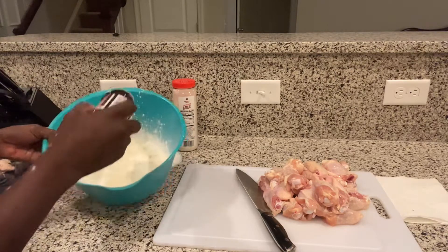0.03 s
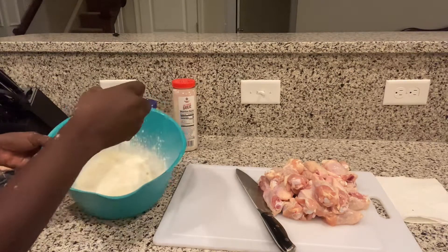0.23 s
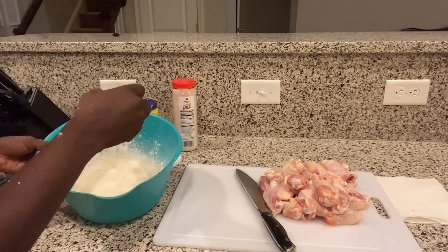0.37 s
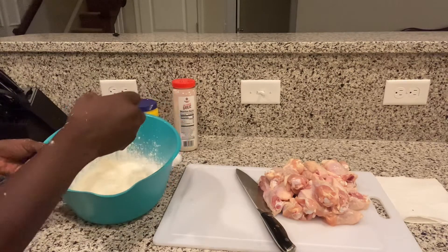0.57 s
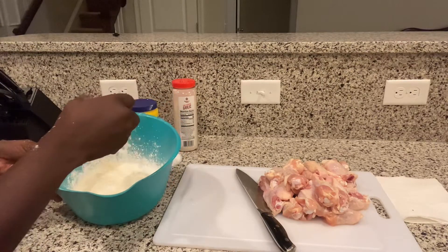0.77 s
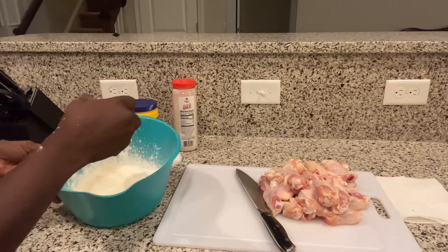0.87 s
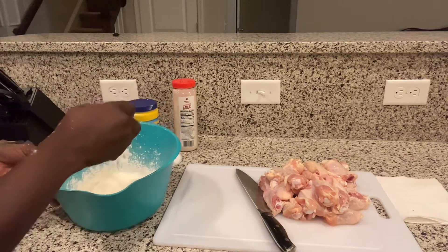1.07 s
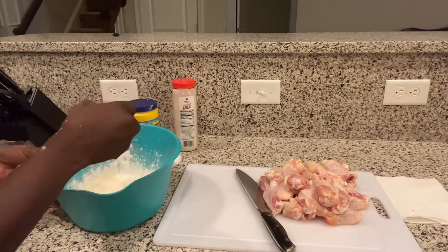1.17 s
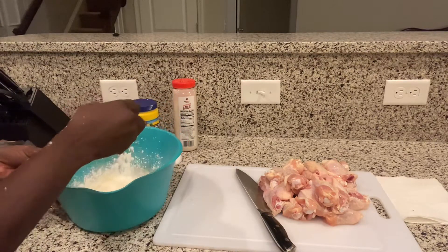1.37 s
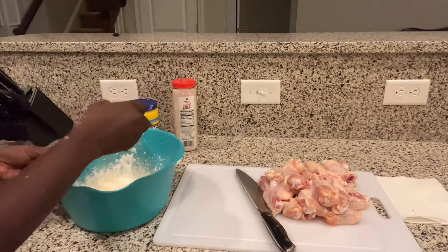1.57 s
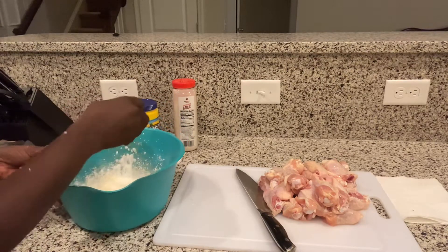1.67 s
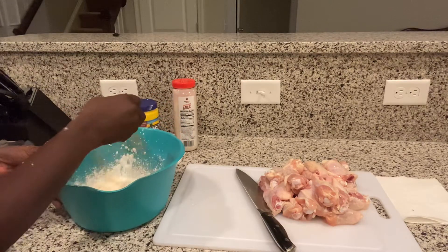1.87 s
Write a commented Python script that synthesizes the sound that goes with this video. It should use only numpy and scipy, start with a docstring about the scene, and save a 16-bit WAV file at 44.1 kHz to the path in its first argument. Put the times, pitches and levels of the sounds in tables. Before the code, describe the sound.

Close by in a hard-walled kitchen, a plastic bowl lands with a hollow knock and quick dull thumps. A plastic shaker then sifts seasoning softly, with small ticks and faint scrapes, over a low appliance hum.

```python
"""A hard-walled kitchen, heard through a closely spaced pair of microphones at the stone counter.
An appliance hums in the background from the start. Almost at once a plastic mixing bowl is set down:
one hollow knock, a few dull thumps as it rocks flat, and its fine powder shifts. From about 0.6 s
seasoning is sifted into it from a plastic shaker, in soft grainy swishes with a few small ticks and,
near the end, faint scrapes. The room answers behind the knock and the shaking."""
import sys
import numpy as np
from scipy import signal
from scipy.fft import rfft, irfft
from scipy.io import wavfile

SR = 44100
rng = np.random.default_rng(int(sys.argv[2]) if len(sys.argv) > 2 else 0)


def wav_record(signal):
    """Record a signal, one row per channel, as 16-bit PCM in the file named by sys.argv[1]."""
    frames = np.transpose(np.atleast_2d(signal))
    bounded = np.clip(frames, -1, 1)
    # unit amplitude maps onto the largest positive 16-bit level
    quanta = np.round(bounded * 32767).astype(np.int16)
    wavfile.write(sys.argv[1], SR, quanta)


N = 83790

# How alike the room sounds at the two microphones. Each row: frequency in Hz, correlation.
MIC_LIKENESS = [(30, .93), (140, .9), (290, .68), (420, .2), (650, -.55), (1300, -.25), (3000, .15),
                (6500, .05), (15000, -.1)]
# Room tone, mostly rumble. Each row: frequency in Hz, relative level in dB.
ROOM_TONE = [(20, -33), (40, -16), (58, -1), (90, -3.5), (125, 1.5), (185, 2.5), (230, -6), (270, 4),
             (310, -4), (400, -3), (445, -13), (610, -12.5), (700, -18), (1150, -23.5), (1600, -35),
             (2100, -38), (2700, -45), (5000, -43.5), (8000, -42), (10000, -57), (13000, -45.5),
             (15000, -101)]
# The appliance's partials. Each row: pitch in Hz, level in dB, share of waver, left over right in dB.
HUM_PARTIALS = [(140.1, -52.3, 0.05, 1.3), (279.7, -58.5, 0.14, -5), (371.5, -71.5, 0.45, -4)]
# The swell of its second partial. Each row: time in seconds, added level in dB.
HUM_SWELL = [(0, -6), (.6, -1), (1.05, -3), (1.25, 10), (1.45, -7.5), (1.9, -0.5)]
# The kitchen's tail. Each row: frequency in Hz, seconds to fall 60 dB.
ROOM_T60 = [(100, 0.4), (400, 0.7), (900, .5), (1800, 0.71), (5000, 0.42), (8000, .5), (14000, 0.5)]
# The colour of its reflections. Each row: frequency in Hz, gain in dB.
ROOM_GAIN = [(60, -28), (150, -13), (300, -5), (430, -10), (540, -5), (640, -2), (760, -7), (900, -5),
             (1150, 2.5), (1600, -11), (2100, -6), (2500, -4.5), (2800, -8), (3500, -6), (5000, -1.5),
             (8000, -8), (14000, 1)]

# Spurts of grains and powder. Each row: start in seconds, length in seconds, grain level in dB,
# powder level in dB.
SPURTS = [(-.03, 0.09, -91, -75), (0.06, 0.14, -70.5, -78), (0.155, 0.039, -68, -73),
          (0.182, 0.087, -68.5, -73), (0.251, 0.095, -70.5, -67), (0.6, 0.05, -77.5, -95),
          (0.692, 0.046, -68.5, -74), (0.738, 0.066, -70, -66), (.822, 0.08, -73, -67),
          (0.886, .07, -70, -68), (0.955, 0.06, -69.5, -63), (1.003, 0.078, -70.5, -65.5),
          (1.11, 0.06, -72.5, -77), (1.175, 0.065, -72, -88), (1.255, 0.07, -74, -88),
          (1.32, .085, -76.5, -85), (1.4, 0.115, -78, -77), (1.54, 0.065, -75.5, -90),
          (1.595, .085, -75, -90), (1.708, 0.085, -73.5, -73), (1.812, 0.14, -76, -73)]
# The grains' hiss and the powder's lower rustle. Each row: frequency in Hz, relative level in dB.
GRAIN_SPECTRUM = [(500, -18), (2800, -7), (3400, -4), (4200, -2.5), (5200, -2.5), (6700, 2), (8200, -2.5),
                  (9300, -11), (10300, -26), (12500, -19), (15000, -30)]
POWDER_SPECTRUM = [(300, -10), (420, 3), (560, 15), (700, -8), (1100, -1), (1500, 4.5), (1850, -.5),
                   (2150, 1.5), (2700, -22), (4000, -8), (9000, -53)]
# Scrapes on the shaker's wall. Each row: peak time in seconds, level in dB, pitch in Hz.
SCRAPES = [(.01, -77, 3670), (1.555, -81, 4200), (1.737, -74.5, 4200), (1.86, -77, 4160)]
# Ticks of the shaker. Each row: start in seconds, click level in dB, body level in dB.
SHAKER_TICKS = [(.7038, -63, -78), (.7467, -64, -70), (.7711, -63, -69), (0.9028, -59, -64),
                (0.9058, -54, -56.5), (0.9325, -59, -62), (0.9675, -59, -61), (0.975, -61, -72),
                (0.9855, -54.5, -64), (0.9883, -62, -55.5), (1.0085, -71, -61), (1.028, -65, -63),
                (1.3745, -70, -67)]
# A tap on plastic, its click and its body. Each row: frequency in Hz, relative level in dB.
TAP_CLICK = [(1000, -25), (2800, -20), (3500, -2), (4200, 1.5), (7800, 2.5), (9500, -7), (10400, -16),
             (12500, -14), (15000, -39)]
TAP_BODY = [(300, -2), (530, 9), (700, -10), (1150, -6), (1550, 7), (1850, 0), (2150, 0), (2500, -28),
            (6000, -43)]

# The bowl's foot chattering on stone. Each row: start in seconds, click level in dB, body level in dB.
FOOT_CHATTER = [(.1555, -76, -46), (.1665, -52.5, -54), (.1835, -74, -47.5), (.2265, -74, -55),
                (.256, -66, -70), (.2815, -75, -54), (.2995, -78, -53)]
# The bowl rocking. Each row: start in seconds, level in dB, pitch in Hz.
ROCKING_THUMPS = [(0.13, -40, 77), (0.145, -31, 300), (.174, -34, 154), (0.203, -34, 143), (0.23, -40, 106)]
# The edge's first touch and the crack of contact. Each row: frequency in Hz, relative level in dB.
EDGE_CLICK = [(1500, -9), (3500, -6), (5500, 5), (7500, -3), (9300, -14), (10300, -32), (12500, -28),
              (15000, -48)]
CONTACT_CRACK = [(60, -5), (300, 8), (650, 1), (1100, 3), (1400, 12), (2400, 11), (2750, -1), (3300, 3),
                 (4200, 1), (5200, 6), (6400, 7), (8000, -4), (10000, -30), (13000, -27), (15000, -33)]
# The bowl's modes. Each row: pitch in Hz, level in dB, seconds to fall 60 dB, build-up in seconds,
# left over right in dB.
BOWL_MODES = [(190, -20.5, .075, .009, .6), (357, 3.3, .026, .008, -2.2), (463, -13.2, .027, .0009, -.4),
              (557, -21.1, .035, .0016, -8), (735, -35, .06, .001, 9), (860, -24.5, .02, .0016, 11),
              (1340, -32, .03, .0012, -1), (1532, -27, .018, .0012, -1), (1655, -21.5, .024, .001, -2),
              (1690, -54, .52, .004, -2), (1950, -38, .035, .0006, -1), (2155, -33.5, .03, .0006, -2),
              (2330, -40, .03, .0006, -1), (2470, -35.5, .034, .0006, 0), (2910, -41, .028, .0005, -1),
              (3370, -38, .016, .0005, 0), (3620, -43, .018, .0005, 0), (4100, -43, .017, .0005, 0)]


def amp(db):
    """Decibels to gain."""
    return 10 ** (np.asarray(db) / 20)


def unit(x):
    """Scales to rms 1."""
    return x / np.sqrt(np.mean(x ** 2) + 1e-20)


def curve_at(points, hz):
    """Reads a curve on a log-frequency axis."""
    f, value = np.transpose(points)
    return np.interp(np.log(hz + 1), np.log(f + 1), value)


def pan(db):
    """Gains at the two microphones, the left louder by db."""
    return amp(np.array([[db], [-db]]) / 2)


def since(start_s):
    """Seconds since a moment, zero before it."""
    return np.maximum(np.arange(N) / SR - start_s, 0)


def colour(x, spectrum):
    """Filters by a spectrum in dB."""
    size = x.shape[-1]
    return irfft(rfft(x) * amp(curve_at(spectrum, np.fft.rfftfreq(size, 1 / SR))), size)


def pair(x, likeness):
    """Makes two unrelated channels partly alike."""
    left, other = rfft(x)
    right = likeness * left + np.sqrt(1 - likeness ** 2) * other
    return irfft(np.array([left, right]), x.shape[-1])


def diffuse():
    """White noise as two closely spaced microphones hear it in a room."""
    return pair(rng.standard_normal((2, N)), curve_at(MIC_LIKENESS, np.fft.rfftfreq(N, 1 / SR)))


def band(noise, hz, width_hz):
    """One bell-shaped band of a noise, at rms 1."""
    bell = np.exp(-((np.fft.rfftfreq(N, 1 / SR) - hz) / width_hz) ** 2)
    return unit(irfft(rfft(noise) * bell, N))


def drift(rate_hz):
    """Slow random motion of rms 1."""
    return band(rng.standard_normal(N), 0, rate_hz)


def snap(start_s, decay_s, spectrum, size=4096):
    """A very short burst of coloured noise."""
    noise = unit(colour(pair(rng.standard_normal((2, size)), likeness=.4), spectrum))
    out, start = np.zeros((2, N)), round(start_s * SR)
    out[:, start:start + size] = noise * np.exp(-np.arange(size) / SR / decay_s)
    return out


def room_tone(level_db=-52):
    """The kitchen's low rumble and air, all around the microphones."""
    return amp(level_db) * unit(colour(diffuse(), ROOM_TONE))


def appliance(waver_hz=6, whine_db=-88):
    """In the background, a wavering motor hum with a faint whine."""
    t, hum = since(0), np.zeros((2, N))
    for k, (hz, db, waver, pan_db) in enumerate(HUM_PARTIALS):
        swell_db = np.interp(t, *np.transpose(HUM_SWELL)) if k == 1 else 0
        phase = 2 * np.pi * hz * t
        tone = (1 + waver * drift(waver_hz)) * np.sin(phase)
        tone += waver * drift(waver_hz) * np.cos(phase)  # the phase wanders too
        hum += pan(pan_db) * amp(db + swell_db) * np.sqrt(2) * tone
    return hum + amp(whine_db) * band(diffuse(), hz=3500, width_hz=105)


def kitchen_reverb(sound, delay_s=.0069, early_db=-6.5, early_decay_s=.0095):
    """Counter and wall reflect back to the microphones first, then a tail dies band by band."""
    hz, frame_s, bands = signal.stft(diffuse(), SR, nperseg=256)
    t60, t = curve_at(ROOM_T60, hz)[:, None], since(delay_s)
    fade = amp(-60 * frame_s / t60) * np.sqrt(2 * np.log(1000) / (t60 * SR))  # equal energy per band
    tail = signal.istft(bands * fade, SR, nperseg=256)[1][:, :N]
    early = diffuse() * np.exp(-t / early_decay_s) * np.sqrt(2 / (early_decay_s * SR))
    response = colour(tail + amp(early_db) * early, ROOM_GAIN) * (t > 0)
    return signal.fftconvolve(sound.mean(0)[None], response, axes=1)[:, :N]


def wall_scrapes(half_width_s=.02):
    """Grains scrape along the shaker's plastic wall and ring it briefly."""
    t = since(0)
    return sum(amp(db) * np.exp(-((t - peak_s) / half_width_s) ** 2) * band(diffuse(), hz, width_hz=750)
               for peak_s, db, hz in SCRAPES)


def plastic_taps(rows, click_decay_s=.0025, body_decay_s=.0039):
    """Light contacts on plastic, a little to the right: a sharp click and the wall's short answer."""
    taps = np.zeros((2, N))
    for start_s, click_db, body_db in rows:
        taps += amp(click_db) * snap(start_s, click_decay_s, TAP_CLICK)
        taps += amp(body_db) * snap(start_s, body_decay_s, TAP_BODY)
    return pan(db=-3) * taps


def grains_and_powder(grains_per_s=4000, spread_db=2, rise_s=.012, fall_s=.016, clump_db=1.8):
    """Near the centre, each spurt lets a cloud of tiny grains slide and land while powder rustles."""
    sizes = amp(spread_db * np.minimum(rng.exponential(1, (2, N)), 4))
    signs = rng.choice([-1., 1.], (2, N))
    landings = rng.random((2, N)) < grains_per_s / SR
    grains = unit(colour(pair(sizes * signs * landings, likeness=.086), GRAIN_SPECTRUM))
    powder = unit(colour(diffuse(), POWDER_SPECTRUM))
    t, flow = since(0), np.zeros((2, N))
    for start_s, length_s, grain_db, powder_db in SPURTS:
        swell = .5 + .5 * np.tanh((t - start_s) / rise_s - .5)
        ebb = .5 + .5 * np.tanh((start_s + length_s - t) / fall_s - .5)
        flow += swell * ebb * (amp(grain_db) * grains + amp(powder_db) * powder)
    clumps = amp(clump_db * drift(rate_hz=70))  # the flow comes unevenly
    return pan(db=-.5) * clumps * flow


def bowl_settling(rise_s=.0052):
    """Soft low thumps and a faint chatter as the bowl rocks flat on the counter."""
    out = plastic_taps(FOOT_CHATTER)
    for start_s, db, hz in ROCKING_THUMPS:
        t = since(start_s)
        pulse = t / rise_s * np.exp(1 - t / rise_s)
        out += amp(db) * pulse * np.sin(2 * np.pi * hz * t)
    return out


def bowl_knock(touch_s=.1138, knock_s=.11416, click_db=-32.5, crack_db=-37.8):
    """The edge clicks and scuffs on the stone, then the flexing base drives the powder-damped modes."""
    click = amp(click_db) * snap(touch_s, decay_s=.0011, spectrum=EDGE_CLICK)
    crack = amp(crack_db) * snap(touch_s, decay_s=.004, spectrum=CONTACT_CRACK)
    out = pan(db=-3) * (click + crack)
    t = since(knock_s)
    lag_rad = np.array([[0], [.4]])  # the left microphone hears the ring first
    for k, (hz, db, t60, rise_s, pan_db) in enumerate(BOWL_MODES):
        envelope = amp(db - 60 * t / t60) * (1 - np.exp(-(t / rise_s) ** 2))
        sense = (-1) ** k  # neighbouring modes swing opposite ways
        out += sense * pan(pan_db) * envelope * np.sin(2 * np.pi * hz * t - lag_rad)
    return out


def scene(sifting_send_db=-9):
    """Bowl and shaker in front at the counter; reflections, room tone and hum behind them."""
    knock = bowl_knock()
    sifting = grains_and_powder() + plastic_taps(SHAKER_TICKS) + wall_scrapes()
    direct = knock + bowl_settling() + sifting
    reflections = kitchen_reverb(knock + amp(sifting_send_db) * sifting)
    return direct + reflections + room_tone() + appliance()


def record(dry, cutoff_hz=14900):
    """The recorder cuts the highest treble from both microphones."""
    lowpass = signal.firwin(511, cutoff_hz, window=("kaiser", 9), fs=SR)
    return signal.oaconvolve(dry, lowpass[None], "same")


dry = scene()
out = record(dry)
wav_record(out)
```